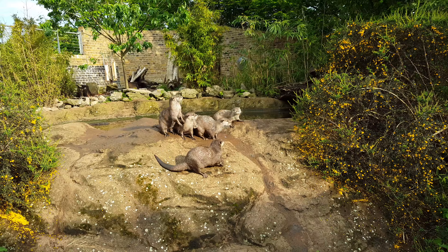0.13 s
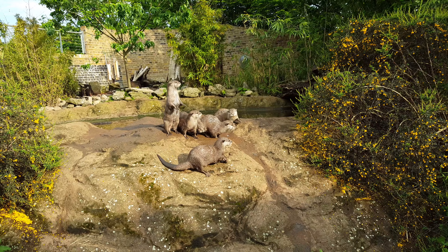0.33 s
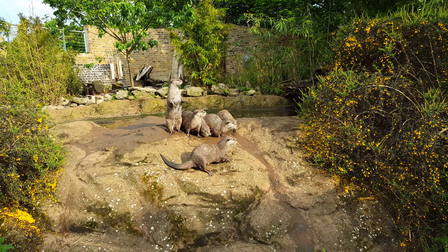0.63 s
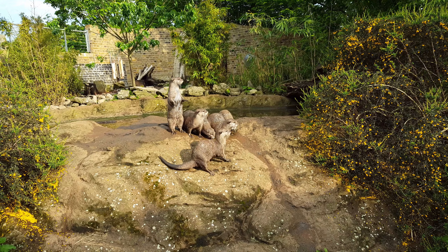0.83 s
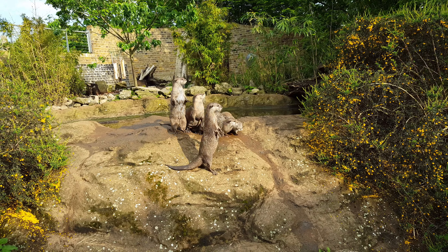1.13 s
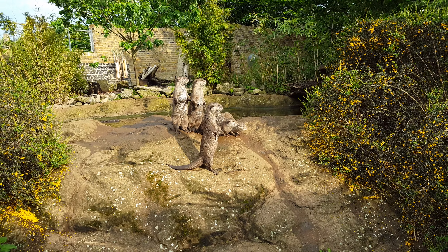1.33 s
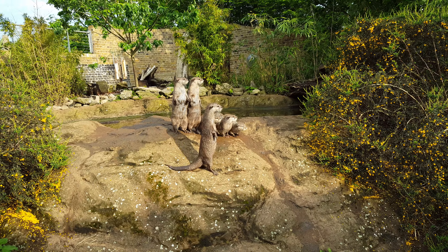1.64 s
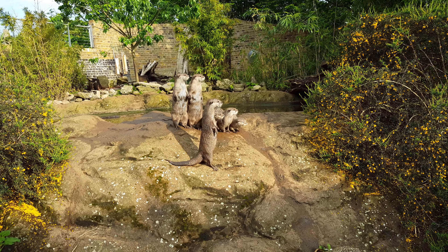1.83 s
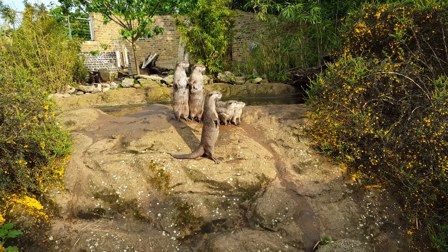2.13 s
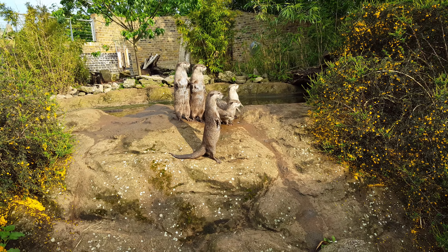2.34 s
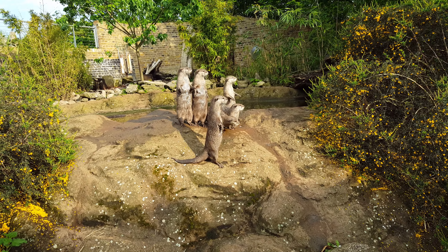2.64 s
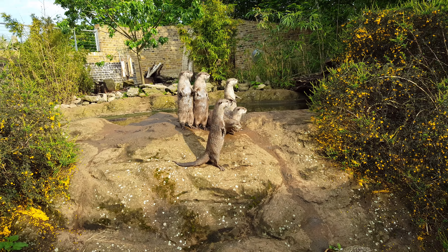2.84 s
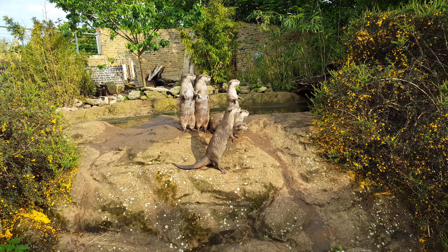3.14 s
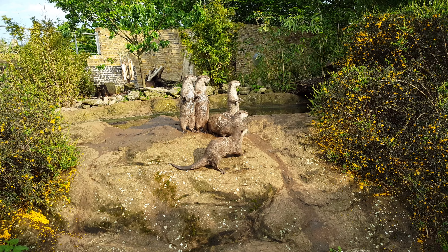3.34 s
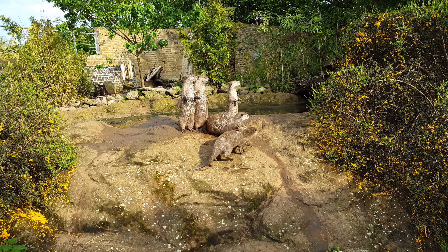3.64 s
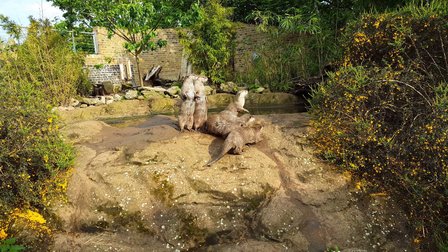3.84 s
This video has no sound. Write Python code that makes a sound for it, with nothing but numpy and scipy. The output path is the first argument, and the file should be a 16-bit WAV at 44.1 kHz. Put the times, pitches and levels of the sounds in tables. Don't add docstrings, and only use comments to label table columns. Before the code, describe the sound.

Otters chirp and squeak singly in a walled outdoor pen, then burst into a loud chirp, falling mew, whine and yelps; low rumble and hiss fade in beneath, heard in stereo from some distance.

```python
import sys
import numpy as np
from scipy import signal
from scipy.fft import rfft, irfft
from scipy.io import wavfile
from scipy.ndimage import uniform_filter1d

SR = 44100
rng = np.random.default_rng(int(sys.argv[2]) if len(sys.argv) > 2 else 0)


def wav_out(sig):
    wavfile.write(sys.argv[1], SR, np.round(np.clip(np.atleast_2d(sig).T, -1, 1) * 32767).astype(np.int16))


def rack_gain(trim_db):
    fader = np.asarray(trim_db, float)
    return 10 ** (fader / 20)


N = 176400
TIME_S = np.arange(N) / SR
BIN_HZ = np.maximum(np.arange(N // 2 + 1) * SR / N, 1)
FADE_START_S = 0.37


def at_hz(points, hz):
    table_hz, value = np.array(points).T
    return np.interp(np.log(hz), np.log(table_hz), value)


def rms_one(x):
    return x / np.sqrt(np.mean(x ** 2) + 1e-20)


def drift(rate_hz, size):
    r = np.exp(-40 * np.pi * rate_hz / SR)
    white = rng.standard_normal(size // 20 + 3002)
    slow = signal.lfilter([1], [1, -2 * r, r * r], white)[3000:]
    slow = slow * np.sqrt((1 - r * r) ** 3 / (1 + r * r))
    return np.interp(np.arange(size) / 20, np.arange(len(slow)), slow)


def bandpass(x, low_hz, high_hz):
    return signal.sosfilt(signal.butter(2, [low_hz, high_hz], "band", fs=SR, output="sos"), x)


def highpass(x, order, low_hz):
    return signal.sosfilt(signal.butter(order, low_hz, "high", fs=SR, output="sos"), x)


def call(curve, harmonics_db, lag, pan_db, rough, half=0):
    # (frequency [Hz], gain [dB])
    throat = [(600, 0), (1500, -3), (2400, 1), (3300, 0), (4500, -1), (6000, 1), (9000, 0), (15000, -3)]
    dull_db_per_db = 0.02
    fall_dull_db = -8.5
    shimmer_db, shimmer_hz, break_db = 1.2, 45, 11
    ear_db, ear_hz = 1.6, 30
    crack_per_s, crack_gain = 20, 0.3
    breath_db, breath_linger_s = -5, 0.015
    edge_s = 0.004

    s, hz, db, *mouth = np.transpose(curve)
    first, size = int(s[0] * SR), SR // 2
    t = (first + np.arange(size)) / SR
    pitch_hz = uniform_filter1d(np.interp(t, s, hz), size=200)
    effort_db = np.interp(t, s, db)
    mouth_db = np.interp(t, s, mouth[0]) if mouth else 0

    crack = np.clip(-np.gradient(np.log(pitch_hz)) * SR / crack_per_s, 0, 1) ** 2
    shake = rough + crack_gain * crack
    cycles = np.cumsum(pitch_hz * (1 + 0.0846 * shake * drift(214, size)))
    ear_lag = pitch_hz * lag * np.array([[-.5], [.5]])
    turn = 2 * np.pi * (cycles + ear_lag) / SR

    wave = 0
    for k, source_db in enumerate(harmonics_db, 1):
        level_db = source_db + at_hz(throat, k * pitch_hz) + mouth_db * (k > 1)
        level_db = level_db + dull_db_per_db * np.log2(k) * (effort_db - db.max())
        level_db = level_db + fall_dull_db * np.sqrt(crack) * max(k - 2, 0)
        unsteady_db = shimmer_db * np.sqrt(k) + break_db * rough * np.log2(k)
        level_db = level_db + unsteady_db * drift(shimmer_hz, size)
        level_db = level_db + ear_db * np.sqrt(k) * drift(ear_hz, size) * [[1], [-1]]
        wave = wave + rack_gain(level_db) * (k * pitch_hz < 16000) * np.sin(k * turn + k * k)
    wave = wave * (1 + half * np.sin(turn / 2) + shake * drift(250, size))

    edge = np.clip(np.minimum(t - s[0], s[-1] - t) / edge_s, 0, 1)
    loud = edge * rack_gain(effort_db)
    white = rng.standard_normal((2, size))
    breath = bandpass(signal.lfilter([.5, .5], [1, -.75], white), 2500, 11000)
    keep = np.exp(-1 / (breath_linger_s * SR))
    puff = rack_gain(breath_db) * signal.lfilter([1 - keep], [1, -keep], np.sqrt(crack) * loud) * breath

    out = np.zeros((2, N + SR))
    pan = rack_gain(pan_db * np.array([[.5], [-.5]]))
    out[:, first:first + size] = np.sqrt(2) * (wave * loud + puff) * pan
    return out[:, :N]


def otters():
    # (time [s], pitch [Hz], level [dB], mouth opening as overtone gain [dB])
    chirp_a = [(0.962, 2260, -52, -8), (0.978, 2715, -50.5, 3.5), (0.992, 2977, -41, -1),
               (1.02, 2885, -43, 9), (1.04, 2590, -35, -7.5), (1.052, 2300, -40, -0.5),
               (1.062, 1680, -60, 6), (1.071, 1450, -70, 4)]
    chirp_b = [(2.155, 2330, -64, -6), (2.162, 2440, -42, -11.5), (2.181, 2965, -42, -1),
               (2.193, 3020, -44.5, 10), (2.201, 3010, -32, 0.1), (2.208, 2890, -30, -3),
               (2.217, 2560, -31, -3), (2.228, 1930, -50.5, 7), (2.24, 1430, -60, 3)]
    chirp_c = [(3.213, 2540, -41, -8), (3.229, 3120, -39.5, 3), (3.24, 3350, -23.5, -4.5),
               (3.257, 3250, -34.5, -0.5), (3.284, 3155, -25.5, -6), (3.299, 2880, -36, -2),
               (3.311, 2466, -23.5, -1), (3.321, 1900, -43.5, 19), (3.337, 1320, -46, 18)]
    whine = [(3.54, 943, -63, -4), (3.574, 942, -54.5, -1.5), (3.626, 922, -54.5, -1.5),
             (3.682, 952, -49, 0.1), (3.714, 933, -49.5, 0.5), (3.75, 919, -48.5, -1),
             (3.784, 836, -41, -9), (3.805, 744, -56, -6)]
    yelp_a = [(3.745, 1910, -46, 1), (3.762, 2177, -34.5, -1.5), (3.777, 2283, -27, -1.5),
              (3.79, 2177, -32, -3), (3.799, 1920, -44, 11), (3.808, 1710, -58, 3)]
    yelp_b = [(3.815, 1866, -54, 2), (3.83, 2110, -35.5, -2), (3.846, 2223, -28.5, -12),
              (3.862, 2127, -35, -3), (3.875, 1895, -46, 0.1), (3.886, 1710, -53, 0.1)]
    # (time [s], pitch [Hz], level [dB])
    waver_a = [(1.178, 1970, -62), (1.188, 2214, -47), (1.197, 2340, -48), (1.21, 2173, -31.5),
               (1.222, 2026, -38.5), (1.27, 2315, -42), (1.294, 2272, -44.5), (1.314, 2306, -63),
               (1.41, 2290, -60)]
    waver_b = [(2.998, 1956, -32), (3.006, 2197, -50), (3.018, 2380, -40), (3.046, 1901, -49.5),
               (3.076, 2279, -47), (3.098, 2332, -40), (3.114, 2174, -38.5), (3.13, 1680, -71)]
    mew = [(3.33, 1444, -39), (3.358, 1345, -37), (3.39, 1094, -39), (3.4, 994, -49), (3.43, 940, -46.5),
           (3.472, 995, -41), (3.505, 971, -54)]
    moan = [(3.79, 787, -42), (3.794, 756, -45.5), (3.882, 731, -45.5), (3.91, 707.6, -46.5),
            (4.0, 694, -43)]
    grunt = [(3.882, 1233, -57), (3.892, 1235, -42), (3.91, 1130, -43), (3.928, 1087, -56)]
    mutter = [(3.94, 1010, -60), (3.952, 997, -48), (3.975, 997, -56), (4.0, 925, -54)]
    coo = [(0.37, 745, -61), (0.38, 743, -59), (0.4, 743, -50.5), (0.425, 750, -57), (0.46, 742, -74)]
    chirp_a_db = [0.5, -1.5, -14, -22, -40]
    chirp_b_db = [2.5, 0, -8.5, -11, -24]
    chirp_c_db = [4, -6.5, -10.5, -15, -42]
    waver_db = [0, -22, -20, -21, -34]
    mew_db = [-25, 0, -16, -22, -26]
    whine_db = [-3.5, 8, -5, 4, -7, -7.5, -12.5, -9, -9, -19, -13, -23]
    moan_db = [3.5, -14, -10.5, -12.5, -11.5, -17.5, -17.5, -22, -21.5, -28, -22, -20.5, -22.5]
    yelp_db = [-0.5, -8, -21, -13, -18, -31]
    pure_db = waver_db[:1]
    return sum([
        call(chirp_a, chirp_a_db, lag=0.41, pan_db=1, rough=0.03),
        call(waver_a, waver_db, lag=1.6, pan_db=0.089, rough=0.059),
        call(chirp_b, chirp_b_db, lag=1, pan_db=-2.5, rough=0.12),
        call(waver_b, waver_db, lag=0.68, pan_db=0.96, rough=0.11),
        call(chirp_c, chirp_c_db, lag=1, pan_db=-0.13, rough=0.082),
        call(mew, mew_db, lag=-0.5, pan_db=2.6, rough=0.22),
        call(whine, whine_db, lag=1.8, pan_db=3.2, rough=0.023),
        call(moan, moan_db, lag=-2.1, pan_db=0.11, rough=0.096),
        call(yelp_a, yelp_db, lag=-1.5, pan_db=0.86, rough=0.11),
        call(yelp_b, yelp_db, lag=-2.4, pan_db=-1.3, rough=0.15, half=0.29),
        call(grunt, waver_db, lag=1.2, pan_db=0.1, rough=0.1),
        call(mutter, pure_db, lag=1.2, pan_db=0.12, rough=0.13),
        call(coo, pure_db, lag=1.4, pan_db=0.1, rough=0.061),
    ])


def pen(x):
    # (left delay [s], right delay [s], level [dB])
    bounces = [
        (.0021, 0.0024, -14),
        (.0074, .0061, -12),
        (.0135, .0152, -11),
        (.098, .101, -23.5),
    ]
    t60_s, tail_db, first_s, wall_cut_hz = 0.27, -11, 0.006, 7000
    t = np.arange(SR // 2) / SR
    density = .02 + .5 * t
    struck = (rng.random((2, len(t))) < density) * (t > first_s)
    hits = rng.standard_normal((2, len(t))) * struck
    tail = hits * rack_gain(-60 * t / t60_s) / np.sqrt(density)
    tail = rack_gain(tail_db) * tail / np.sqrt(np.sum(tail ** 2) / 2)
    for left_s, right_s, db in bounces:
        delay = np.array([[int(left_s * SR)], [int(right_s * SR)]])
        tail = tail + rack_gain(db) * (np.arange(len(t)) == delay)
    tail = signal.lfilter(*signal.butter(1, wall_cut_hz, fs=SR), tail)
    return signal.fftconvolve(x, tail, axes=1)[:, :N]


def tick():
    start_s, level_db, decay_s, low_hz = 1.62, -52, 0.005, 5000
    t = TIME_S - start_s
    burst = rng.standard_normal((2, N)) * (t > 0) * np.exp(-np.maximum(t, 0) / decay_s)
    return rack_gain(level_db) * highpass(burst + 1e-18, 2, low_hz)


def rustle():
    start_s, end_s, level_db = 2.7, 3.75, -61
    progress = np.clip((TIME_S - start_s) / (end_s - start_s), 0, 1)
    swell = np.abs(np.sin(np.pi * progress) ** .5)
    return rack_gain(level_db) * swell * rms_one(bandpass(rng.standard_normal((2, N)), 3100, 3450))


def engine():
    # (multiple of firing rate, level [dB rms])
    orders = [(3, -56), (5, -44), (6, -43.5), (7, -46), (8, -49.5), (9, -54), (14, -55.5), (17, -58)]
    firing_hz, wander, order_wander_db = 18.55, 0.0058, 4
    turn = 2 * np.pi * np.cumsum(firing_hz * (1 + wander * drift(2.42, N))) / SR
    out = 0
    for k, db in orders:
        level = rack_gain(db + order_wander_db * drift(2.9, N))
        out = out + level * np.sin(int(round(k)) * turn + rng.uniform(0, 2 * np.pi))
    return np.sqrt(2) * out


def hum():
    # (frequency [Hz], level [dB rms])
    tones = [
        (50.3, -48),
        (52.1, -50),
    ]
    in_step_s = 1.865
    return np.sqrt(2) * sum(rack_gain(db) * np.sin(2 * np.pi * hz * (TIME_S - in_step_s)) for hz, db in tones)


def banded_noise(spectrum, patchy_db):
    # (frequency [Hz], left-right likeness [-1 to 1])
    likeness = [(60, 0.9), (150, 0.96), (380, 0.81), (950, -0.31), (2380, 0.004), (5980, 0.11),
                (15000, 0.0011)]
    low_hz, high_hz = spectrum[0][0], spectrum[-1][0]
    together = drift(0.37, N)
    white = rfft(rng.standard_normal((2, N))) * rack_gain(at_hz(spectrum, BIN_HZ))
    white = white * (BIN_HZ > low_hz) * (BIN_HZ < high_hz)
    alike = np.clip(at_hz(likeness, BIN_HZ), -1, 1)
    pair = np.sqrt(1 + alike) * white[0] + np.sqrt(1 - alike) * white[1] * [[1], [-1]]
    out = 0
    for centre in np.arange(np.log2(low_hz), np.log2(high_hz) + .5, .5):
        share = np.cos(np.pi * np.clip(np.log2(BIN_HZ) - centre, -.5, .5)) ** 2
        flicker_db = patchy_db * (1.9 * together + drift(11.0, N))
        out = out + irfft(pair * share, N) * rack_gain(flicker_db)
    return rms_one(out)


def traffic():
    # (frequency [Hz], density [dB per Hz])
    spectrum = [(13, -52), (22, -46), (38, -14), (65, -9.5), (103, -6.5), (120, -5.5), (188, -8),
                (265, -14.5), (400, -27.5), (520, -23.5), (880, -120)]
    return rack_gain(-40) * banded_noise(spectrum, patchy_db=-0.5)


def air():
    # (frequency [Hz], density [dB per Hz])
    spectrum = [(180, -24.5), (300, -6), (461, -9.5), (970, -6.5), (1480, -13), (3300, -22), (4000, -25.5),
                (9800, -36.5), (11600, -35.5), (15700, -49)]
    treble_hz, fade_s, fade_power = 3000, 1.8, 0.18
    hiss = rack_gain(-41.5) * banded_noise(spectrum, patchy_db=0.5)
    treble = highpass(hiss, 1, treble_hz)
    arrived = np.clip((TIME_S - FADE_START_S) / fade_s, 0, 1) ** fade_power
    return hiss - treble * (1 - arrived)


def scene():
    fade_s, low_power, air_power = 0.78, 0.84, 0.91
    voices = otters()
    fade = np.clip((TIME_S - FADE_START_S) / fade_s, 0, 1)
    low = traffic() + engine() + hum()
    background = fade ** low_power * low + fade ** air_power * air()
    return voices + pen(voices) + background + tick() + rustle()


def top_cut(x):
    return signal.sosfilt(signal.butter(12, 15710, fs=SR, output="sos"), x)


def record(dry):
    # (frequency [Hz], left-right [dB])
    shade_db = [(60, 1.5), (240, 0.5), (950, 0.5), (3770, 0.5), (15000, -7.5)]
    edge_s = 0.004
    shade = rack_gain(at_hz(shade_db, BIN_HZ) * np.array([[.5], [-.5]]))
    start = np.clip((TIME_S - FADE_START_S) / edge_s, 0, 1)
    mix = irfft(rfft(dry) * shade, N) * start
    return top_cut(mix)


dry = scene()
out = record(dry)
wav_out(out)
```